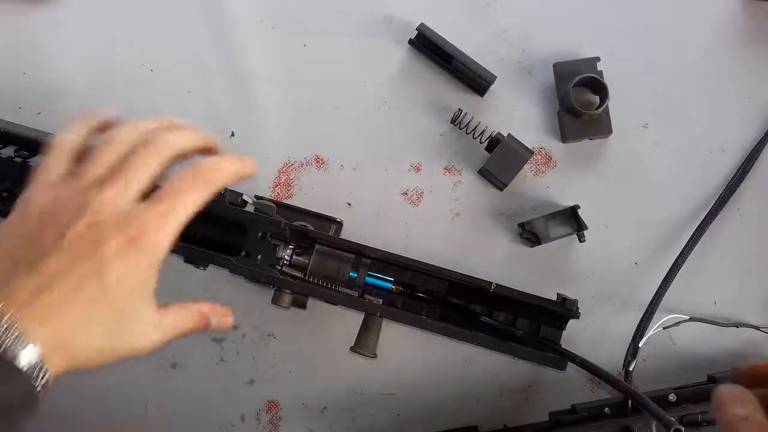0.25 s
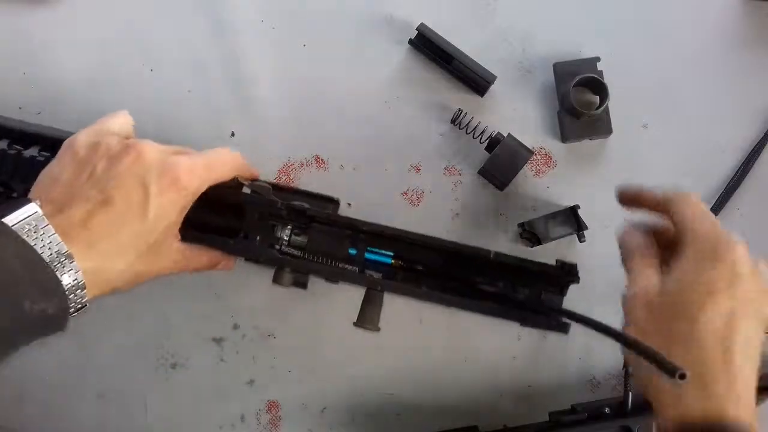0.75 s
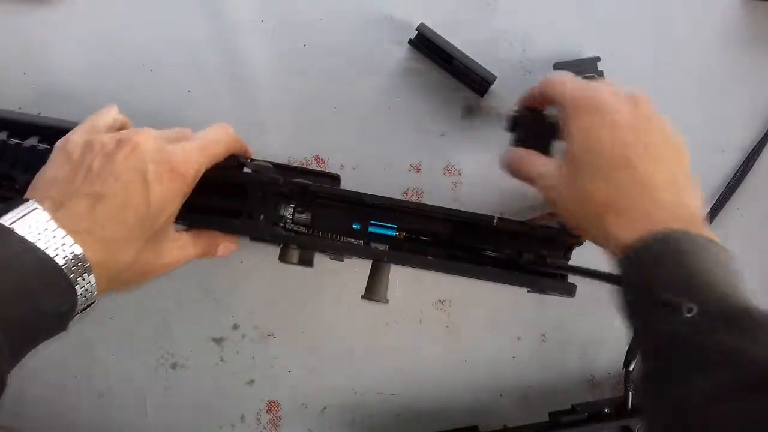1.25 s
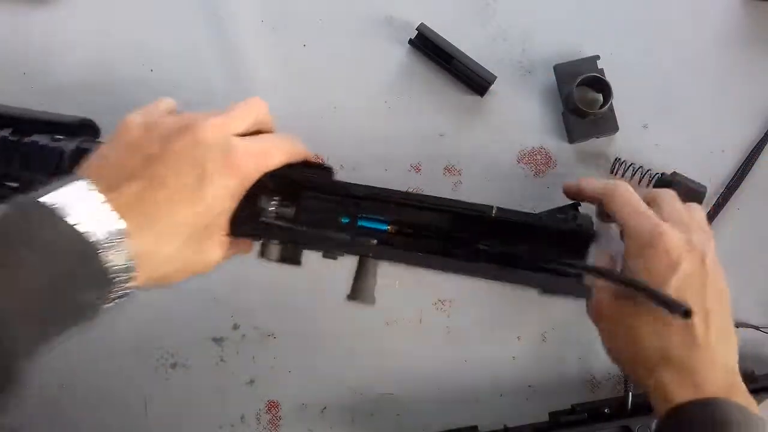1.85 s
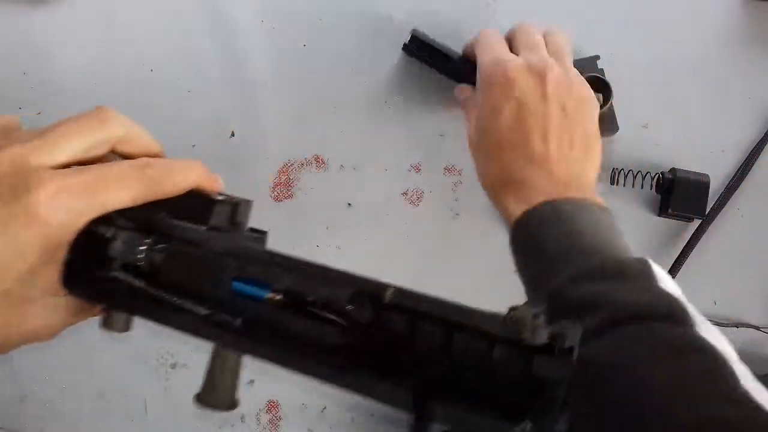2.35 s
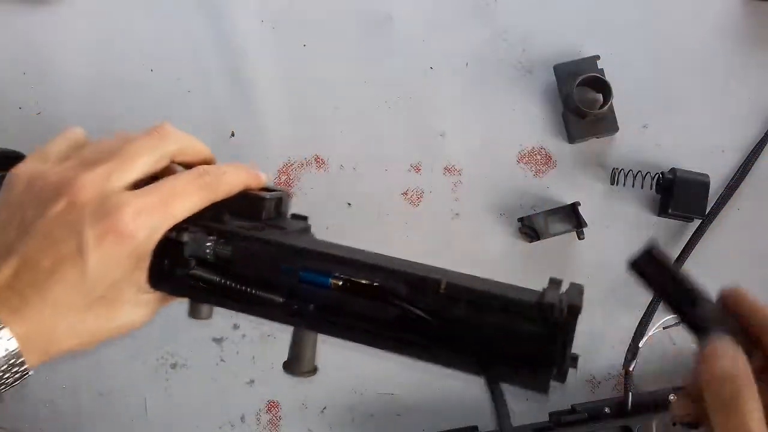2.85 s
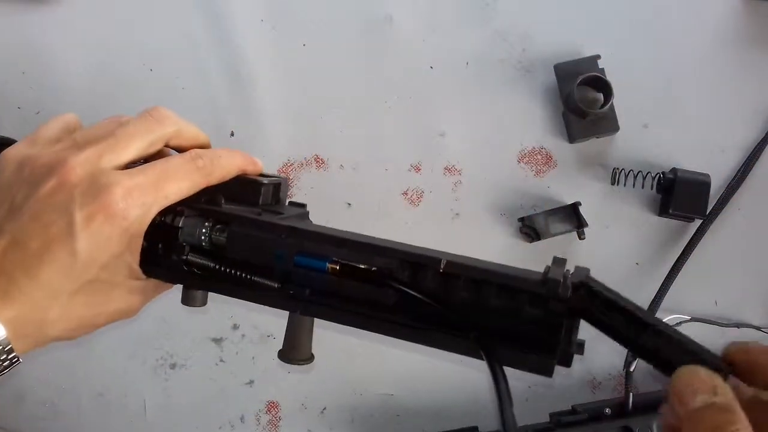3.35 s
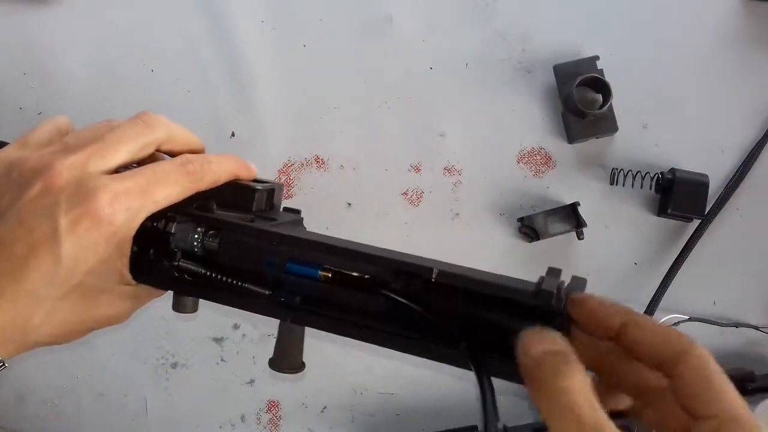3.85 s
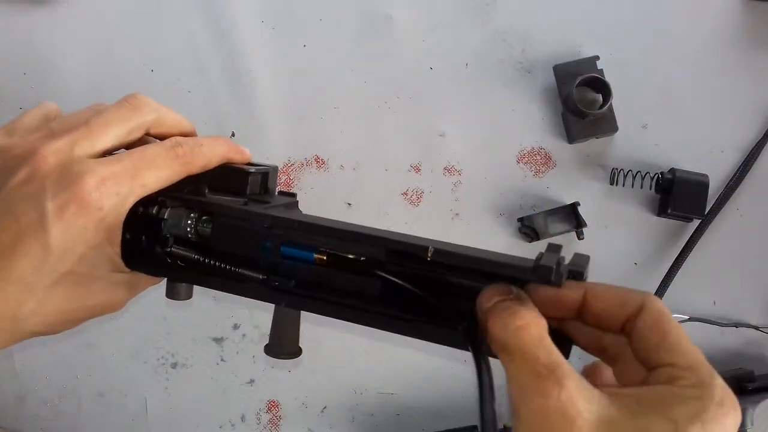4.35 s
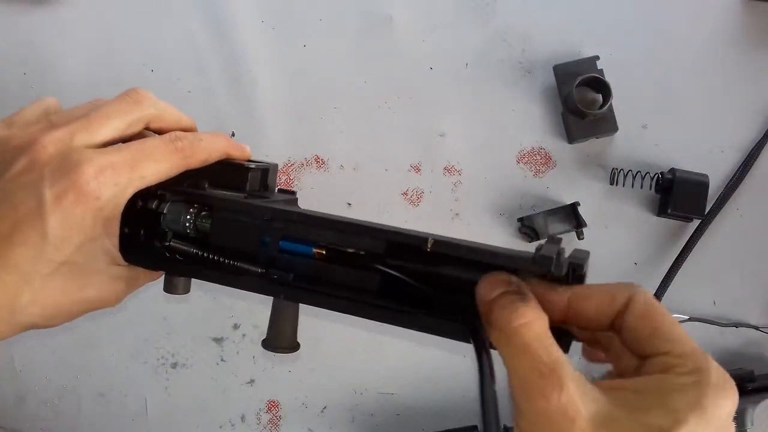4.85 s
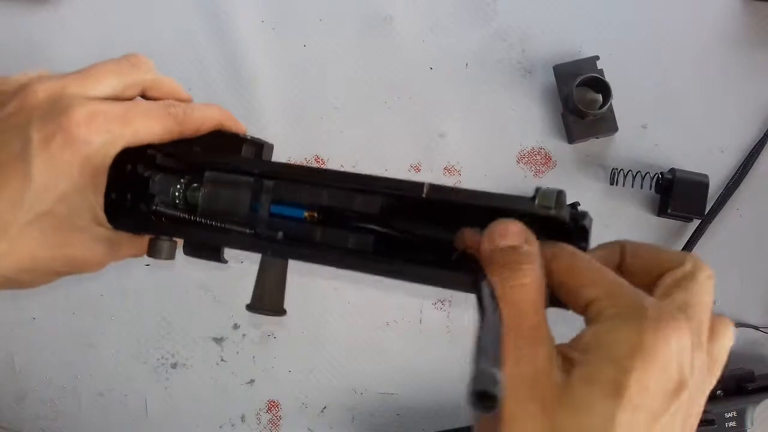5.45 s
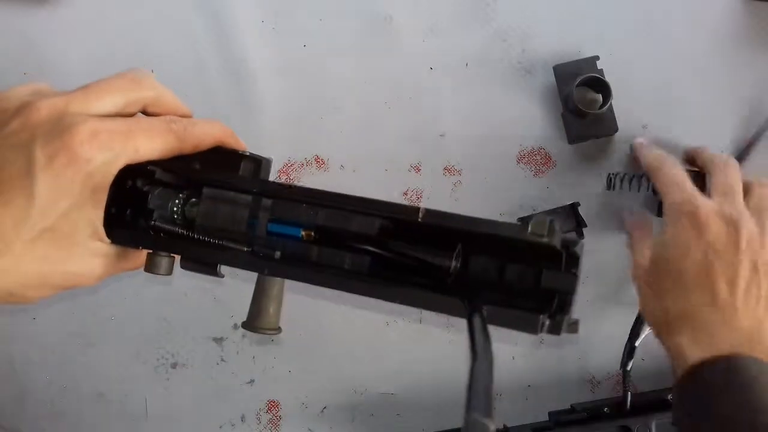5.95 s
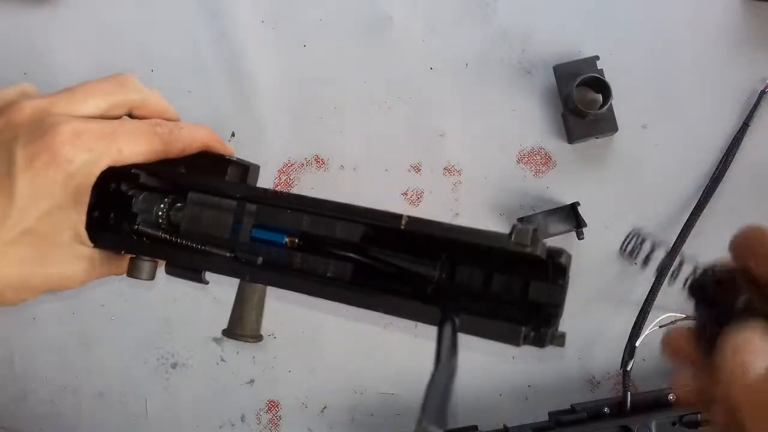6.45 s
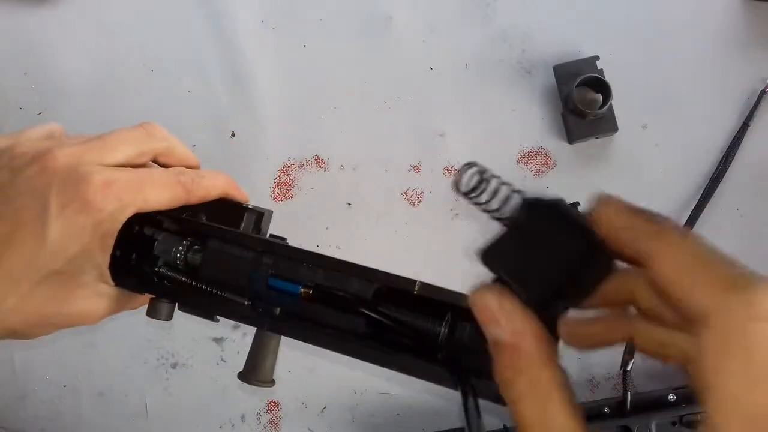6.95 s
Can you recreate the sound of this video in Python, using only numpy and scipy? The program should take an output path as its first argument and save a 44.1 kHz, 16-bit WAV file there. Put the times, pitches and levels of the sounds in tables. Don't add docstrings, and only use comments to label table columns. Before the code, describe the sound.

After a brief fade-in, rifle parts knock and shift on a wooden table in a small quiet room, with a sharp clack as a block is set down. Metal then clinks and scrapes in a tube, a latch snaps and chatters in tight bunches, and a heavy thump follows. Faint birds chirp at the end over low hum. Close, dull, nearly mono microphone.

```python
import sys
import numpy as np
from scipy import signal
from scipy.io import wavfile
from scipy.ndimage import uniform_filter1d

SR = 44100
rng = np.random.default_rng(int(sys.argv[2]) if len(sys.argv) > 2 else 0)


def linear_from_db(decibels):
    return 10 ** (np.asarray(decibels, float) / 20)


def to_wav(s):
    ch = np.atleast_2d(s).T
    pcm = np.round(np.clip(ch, -1, 1) * 32767)
    wavfile.write(sys.argv[1], SR, pcm.astype(np.int16))


N = 317343

# low_hz, high_hz
WOOD_EDGES = [(220, 501), (540, 2080), (2200, 4170)]
TUBE_EDGES = [(200, 1090), (1010, 2200), (2200, 3950)]
LATCH_EDGES = [(260, 1000), (1100, 2200), (2200, 4830)]


def evened(x):
    return x / np.sqrt(np.mean(x ** 2) + 1e-20)


def read(points, hz):
    f, value = np.transpose(points)
    return np.interp(np.log(hz + 1), np.log(f + 1), value)


def add(mix, start_s, sound):
    part = mix[round(start_s * SR):][:len(sound)]
    part += sound[:len(part)]


def resonate(x, hz, width):
    turn = np.exp(2j * np.pi * np.cumsum(hz * np.ones(len(x))) / SR)
    r = np.exp(-np.pi * width / SR)
    return 2 * (turn * signal.lfilter([1 - r], [1, -r], x / turn)).real


def registers(x, edges):
    # low_hz, high_hz
    tick_edges = (5100, 7070)
    thud, body, clink = edges
    cuts = [(thud, 4), (body, 4), ((clink[0], 5200), 4), (tick_edges, 1)]
    parts = [signal.sosfilt(signal.butter(order, hz, "band", fs=SR, output="sos"), x) for hz, order in cuts]
    dull = signal.sosfilt(signal.butter(10, clink[1], fs=SR, output="sos"), parts[:3])
    return np.array([*dull, parts[3]])


def blows(rows, modes, edges, crack_s, crack_db, ring_s, spot_db, spot_width, rise_s, tick_db):
    out = np.zeros(N)
    t = np.arange(5000) / SR
    for start_s, clink_db, thud_db, body_db, spot_hz in rows:
        hz, width, db = np.transpose([*modes, (spot_hz, spot_width, spot_db)])
        t60 = np.minimum(3.1 / width, ring_s * (1000 / hz) ** 0.5)
        vary_db, vary_hz = rng.standard_normal((2, len(hz)))
        fading = linear_from_db(db + 2 * vary_db - 60 * t[:, None] / t60)
        tones = fading * np.sin(2 * np.pi * hz * (1 + 0.032 * vary_hz) * t[:, None])
        ring = tones.sum(1)
        crack = rng.standard_normal(len(t)) * linear_from_db(-60 * t / crack_s)
        blow = ring / abs(ring).max() + linear_from_db(crack_db) * crack
        parts = registers(blow * (1 - np.exp(-t / rise_s)), edges)
        top_db = clink_db + tick_db + 0.055 * (body_db - clink_db)
        peaks = linear_from_db(np.array([thud_db, body_db, clink_db, top_db]) + 1.5)
        add(out, start_s + 0.00082, peaks / abs(parts).max(1) @ parts)
    return out


def slides(rows, mix, tone, edges, per_s, size_db, plain_db, gap=None, gap_db=-60):
    out = np.zeros(N)
    base_db, share = np.array(mix)
    for peak_s, rise, fall, peak_db, colour_db in rows:
        t = np.arange(peak_s - rise, peak_s + fall, 1 / SR)[:SR // 2]
        chance, size, sign = rng.random((len(t), 3)).T
        slips = (chance < per_s / SR) * linear_from_db(-size_db * np.log(size + 0.0046)) * np.sign(sign - 0.5)
        resonances = [*tone]
        if gap is not None:
            resonances.append((np.interp(t, *np.transpose(gap)), 250, gap_db))
        rung = linear_from_db(plain_db) * evened(slips)
        for hz, width, db in resonances:
            once = resonate(slips, hz, 2.0 * width)
            rung = rung + linear_from_db(db) * evened(resonate(once, hz, 1.6 * width))
        levels = linear_from_db(base_db + share * colour_db)
        stroke = sum(evened(part) * level for part, level in zip(registers(rung, edges), levels))
        away = np.maximum((peak_s - t) / rise, (t - peak_s) / fall)
        pressure = linear_from_db(peak_db - 25 * away ** 1.16)
        soft_ends = signal.windows.tukey(len(t), min(1, 120 / len(t)))
        add(out, t[0], stroke * pressure * soft_ends)
    return out


def steady_noise(spectrum, level_db, patchy_db):
    # pitch_hz, width_hz, level_db
    port_dips = [(10010, 760, -10.5), (15000, 270, -15)]
    frames, hz = N // 1024 + 5, np.fft.rfftfreq(4096, 1 / SR)
    a, b, patches = rng.standard_normal((frames, 2049, 3)).T
    patches = evened(uniform_filter1d(uniform_filter1d(patches, 30, 0), 5, 1))
    shape_db = read(spectrum, hz)
    for f, width, db in port_dips:
        shape_db = shape_db + db / (1 + ((hz - f) / (width / 2)) ** 4)
    z = (a + 1j * b) * linear_from_db(shape_db[:, None] + patchy_db * patches)
    noise = signal.istft(z, nperseg=4096, noverlap=3072)[1][:N]
    return linear_from_db(level_db) * evened(noise)


def hum():
    # pitch_hz, level_db (per Hz)
    middle = [(28, -27.5), (48, -14), (66, 4.5), (90, -4.5), (118, -1.5), (170, -6), (330, -9), (800, -12),
              (2000, -16), (3600, -17.5), (4700, -30.5), (8000, -31), (13000, -30.5), (15800, -31.5)]
    # pitch_hz, level_db (per Hz)
    difference = [(29, -25.5), (50, -7.5), (343, -5.5), (458, -8), (505, -5), (642, -7.5), (1940, -9),
                  (3470, -11), (4740, -21), (13700, -20.5), (15800, -18)]
    return steady_noise(middle, -65, patchy_db=1.16), steady_noise(difference, -70.5, patchy_db=3.0)


def booms():
    # start_s, peak_db, pitch_hz
    rows = [
        (0.478, -57, 119.3),
        (0.706, -41, 110.2),
        (0.971, -50, 130.6),
        (1.558, -51, 145),
        (1.78, -57, 135.7),
        (2.309, -59, 68.6),
        (2.874, -54.5, 125.3),
        (3.864, -62, 70),
        (6.058, -51.5, 99.8),
    ]
    out, t = np.zeros(N), np.arange(20000) / SR
    for start_s, db, hz in rows:
        ring = np.sin(2 * np.pi * hz * t)
        ring += 0.17 * np.sin(2 * np.pi * 2.0 * hz * t)
        ring += 0.14 * np.sin(2 * np.pi * 0.5 * hz * t)
        add(out, start_s, linear_from_db(db + 1.5 - 60 * t / 0.37) * (1 - np.exp(-t / 0.0016)) * ring)
    return out


def table_knocks():
    # start_s, clink_db, thud_db, body_db, spot_hz
    rows = [(0.4798, -48.5, -45, -54, 2580), (0.5156, -48, -55, -77, 3540), (0.624, -51, -67, -68, 3310),
            (0.7055, -32.5, -28.5, -28.5, 3500), (0.8503, -68, -54, -50, 2200),
            (0.8884, -47, -53, -46, 2200), (0.9773, -37.5, -43.5, -43.5, 2360),
            (1.054, -39, -43, -39.5, 3010), (1.5495, -29, -36.5, -31, 4030),
            (1.5906, -35, -38.5, -39.5, 2790), (1.6346, -38, -57, -40.5, 2870),
            (1.9989, -43, -51, -47, 3610), (2.2995, -54, -55.5, -53, 2440)]
    # pitch_hz, width_hz, level_db
    modes = [(440, 210, 3), (624, 20, -18), (897, 26, -8.5), (1274, 28, -21), (1590, 31, -8.5),
             (2440, 18, -41), (2160, 42, -63.5), (2974, 72, -3), (3310, 18, -30), (3500, 44, 0.5),
             (4100, 25, -6.5), (4240, 37, -53)]
    return blows(rows, modes, WOOD_EDGES, crack_s=0.033, crack_db=-1.0, ring_s=0.062,
                 spot_db=3.5, spot_width=160, rise_s=0.00024, tick_db=-23.5)


def low_rumbles():
    # peak_s, rise_s, fall_s, peak_db, colour_db (how much grit)
    rows = [(.487, 0.005, 0.015, -55.5, 7.5), (.7, 0.047, .005, -55.5, -1), (.722, 0.017, 0.09, -37.5, 3),
            (.83, 0.087, 0.74, -56.5, -1.5), (1.018, 0.043, 0.1, -54.5, 9.5), (1.565, .012, 0.04, -33.5, 3),
            (1.6, 0.018, 0.29, -47.5, 5.5), (1.775, 0.016, 0.002, -44.5, -7),
            (2.311, 0.033, 0.1, -62.5, 7.5), (2.516, 0.033, 0.081, -56.5, 6.5), (6.05, 0.03, 0.012, -35, 3)]
    # first row level_db, second row share of the colour
    mix = [(0, -14, -20.5, -38), (0, 1.5, 1.5, 1.9)]
    # pitch_hz, width_hz, level_db
    tone = [(170, 90, -12), (300, 160, -9), (445, 140, -12), (700, 326, 2), (1210, 730, 6), (2500, 1300, 1),
            (3600, 760, -2)]
    # low_hz, high_hz
    edges = [(120, 620), (600, 2200), (2200, 4170)]
    return slides(rows, mix, tone, edges, per_s=4000, size_db=3.5, plain_db=9.0)


def table_drags():
    # peak_s, rise_s, fall_s, peak_db, colour_db (brightness)
    rows = [(.52, 0.035, 0.55, -67.5, 2.5), (1.12, 0.09, 0.81, -66, 0), (.79, 0.089, 0.3, -55, -3),
            (1.058, 0.0093, 0.037, -48, 9), (1.72, 0.15, 0.19, -60, 3.5), (2.355, 0.068, 0.017, -69.5, 16),
            (2.42, 0.082, 0.078, -68.5, 0), (2.6, 0.17, 0.24, -55.5, -16.5), (2.676, .08, 0.12, -50, -18),
            (5.556, 0.025, 0.042, -54.5, 0.5), (5.68, 0.096, 0.053, -65, -12),
            (5.972, 0.11, 0.067, -60.5, 0.5), (6.03, 0.11, 0.059, -52, -5)]
    # first row level_db, second row share of the colour
    mix = [(-4.5, 0.018, 0.1, -18.5), (0, 0.069, 0.86, 1)]
    # pitch_hz, width_hz, level_db
    tone = [(287, 255, -17.5), (456, 55, -10.5), (832, 290, 6), (1200, 730, 9), (2500, 1300, 0),
            (3500, 760, -4)]
    return slides(rows, mix, tone, WOOD_EDGES, per_s=4500, size_db=1.0, plain_db=0.5)


def rings():
    # start_s, peak_db, pitch_hz, t60_s (time to fall by 60 dB)
    rows = [(1.781, -30, 440, 0.21), (3.215, -59, 650, .5), (3.25, -61, 680, 0.62), (3.6, -61, 678, 0.26),
            (3.815, -52, 313, 0.11), (4.86, -50, 664, 0.36), (1.782, -33, 1100, 0.18),
            (1.782, -34.5, 1041, .16), (1.782, -38, 1466, .08), (1.782, -39, 1800, .12),
            (1.782, -40, 800, 0.22), (6.059, -27, 858, .22), (6.059, -29.5, 806, 0.17),
            (6.059, -28.5, 890, 0.22), (6.059, -30, 978, 0.23), (6.059, -33.5, 696, .2),
            (6.059, -34, 438, .2), (6.075, -25.5, 880, .03), (6.089, -22, 900, .025),
            (6.121, -29, 1000, .03), (2.871, -51, 438, .22), (2.871, -53, 855, 0.22),
            (2.871, -50, 715, 0.2), (4.947, -29, 3050, 0.041), (4.438, -31, 3800, .05),
            (4.42, -31, 4150, .04), (1.557, -40, 300, .08), (.708, -41, 213, .15), (.9, -52.5, 312, 0.31),
            (.79, -52, 155, .4), (1.74, -52, 110, .3), (4.44, -50, 300, .1), (4.537, -46, 1880, .06),
            (3.39, -42, 3750, .06), (3.412, -44, 3700, .07)]
    out, t = np.zeros(N), np.arange(20000) / SR
    for start_s, db, hz, t60 in rows:
        add(out, start_s, linear_from_db(db - 60 * t / t60) * (1 - np.exp(-t / 0.0018)) * np.sin(2 * np.pi * hz * t))
    return out


def block_drop():
    # start_s, clink_db, thud_db, body_db, spot_hz
    rows = [
        (1.7809, -15, -30, -13, 3285),
    ]
    # pitch_hz, width_hz, level_db
    modes = [(450, 45, 4.5), (640, 70, -6.5), (1012, 100, 6), (1190, 90, -14.5), (1497, 120, -2),
             (1660, 120, -1), (1968, 90, -1), (2200, 90, -2), (2580, 170, -0.5), (2980, 60, -7.5),
             (3195, 59, 11), (3430, 78, 8), (3700, 120, -5), (3990, 120, -10)]
    # low_hz, high_hz
    edges = [(200, 720), (520, 2500), (2200, 4000)]
    return blows(rows, modes, edges, crack_s=0.0054, crack_db=-5, ring_s=0.015,
                 spot_db=-4.5, spot_width=180, rise_s=0.00016, tick_db=-39)


def board_thumps():
    # start_s, clink_db, thud_db, body_db, spot_hz
    rows = [
        (2.8697, -52.5, -36, -33, 2440),
        (5.945, -62, -59, -55.5, 2880),
        (5.9612, -58.5, -48.5, -71, 2300),
        (6.0578, -35.5, -34.5, -13.5, 1820),
    ]
    # pitch_hz, width_hz, level_db
    modes = [(439, 38, -4), (620, 60, -8), (813, 220, 2.5), (985, 80, 1), (1150, 60, -4), (1380, 80, -8.5),
             (1550, 80, -9.5), (1710, 60, -11.5), (1840, 80, -10.5), (3250, 110, -5), (3540, 80, -16)]
    # low_hz, high_hz
    edges = [(130, 480), (480, 2020), (2400, 4100)]
    return blows(rows, modes, edges, crack_s=0.007, crack_db=-11, ring_s=0.015,
                 spot_db=-26, spot_width=180, rise_s=0.00035, tick_db=-32.5)


def tube_clinks():
    # start_s, clink_db, thud_db, body_db, spot_hz
    rows = [(3.022, -32, -48.5, -38.5, 3990), (3.0892, -43, -47, -59, 4050), (3.1397, -61, -60, -68, 4100),
            (3.2938, -50, -56, -57, 3200), (3.3855, -30.5, -50.5, -58, 3500), (3.4603, -31, -58, -53, 3300),
            (3.5922, -43, -55, -49.5, 3850), (3.7895, -36.5, -70, -57, 3830), (3.8035, -50, -66, -53, 3500),
            (3.8604, -24.5, -57.5, -42.5, 4260), (3.8655, -37, -66, -44.5, 3850),
            (3.887, -49, -65, -65, 3420), (3.9035, -47, -55, -57.5, 4100),
            (4.1639, -46, -59.5, -47.5, 3620)]
    # pitch_hz, width_hz, level_db
    modes = [(650, 13, -22.5), (1066, 53, -23), (1370, 40, -29.5), (1574, 30, -23), (1893, 140, -1.5),
             (2555, 120, -24), (3200, 130, -9.5), (3640, 200, 6), (4050, 170, 10.5), (4550, 110, 8)]
    return blows(rows, modes, TUBE_EDGES, crack_s=0.011, crack_db=-9, ring_s=0.15,
                 spot_db=10, spot_width=390, rise_s=0.00049, tick_db=-20.5)


def tube_slides():
    # peak_s, rise_s, fall_s, peak_db, colour_db (how much the heavy body sounds along)
    rows = [
        (3.06, .02, 0.039, -50.5, 2.5),
        (3.138, 0.01, 0.019, -53, -1),
        (3.215, 0.014, 0.035, -49, -2.5),
        (3.24, 0.041, 0.042, -48, -2),
        (3.365, 0.03, 0.05, -40, -3),
        (3.395, .012, .025, -44.5, -2.5),
        (3.415, 0.011, 0.06, -45.5, -2.5),
        (3.47, 0.012, 0.056, -61, 1),
        (3.8, 0.0029, 0.038, -66.5, 4.5),
    ]
    # first row level_db, second row share of the colour
    mix = [(-8, -4, 0, -13), (3, 2, 0, 0.7)]
    # pitch_hz, width_hz, level_db
    tone = [(674, 21, -20), (1150, 1150, -5.5), (1270, 41, -20), (1643, 36, -16), (3190, 180, -5),
            (4010, 120, -5), (4540, 98, -4)]
    # time_s, pitch_hz
    gap = [(3.04, 4000), (3.22, 4050), (3.37, 4050), (3.40, 3720), (3.46, 3400), (3.86, 3770)]
    return slides(rows, mix, tone, TUBE_EDGES, per_s=2700, size_db=3.0, plain_db=-7, gap=gap, gap_db=2.5)


def latch_snaps():
    # start_s, clink_db, thud_db, body_db, spot_hz
    rows = [(4.4188, -27, -48, -40, 3990), (4.4372, -16.5, -45, -31, 4100),
            (4.4515, -24, -57.5, -36.5, 4230), (4.5347, -45, -58, -46, 3420),
            (4.6023, -47, -74, -60.5, 4240), (4.8435, -32, -59.5, -41, 3700), (4.8486, -15, -42, -28, 3500),
            (4.857, -19.5, -49.5, -31, 3400), (4.9457, -27, -49.5, -40, 3100),
            (4.8535, -23, -54, -33.5, 3300), (4.8615, -25.5, -43, -30.5, 3700),
            (4.867, -26.5, -49.5, -38, 3500), (4.952, -36.5, -57, -44, 3000),
            (4.957, -41.5, -55.5, -48, 2950), (5.2672, -21, -42, -25, 2400), (5.272, -27, -42, -43, 2900),
            (5.533, -45, -60.5, -54, 4100)]
    # pitch_hz, width_hz, level_db
    modes = [(1582, 29, -10), (1895, 88, -6.5), (3320, 140, -1.5), (3610, 73, -10.5), (3920, 63, -0.5),
             (4200, 150, -23), (5000, 110, -17)]
    return blows(rows, modes, LATCH_EDGES, crack_s=0.016, crack_db=-6, ring_s=0.022,
                 spot_db=4.0, spot_width=270, rise_s=0.00027, tick_db=-21.5)


def latch_chatter():
    # start_s, clink_db, thud_db, body_db, spot_hz
    rows = [(5.1378, -45, -61, -52, 3290), (5.1483, -32.5, -58.5, -46.5, 3250),
            (5.1515, -27.5, -55.5, -40.5, 2830), (5.1588, -28.5, -53.5, -30, 2980),
            (5.1635, -28, -52, -31.5, 3050), (5.173, -32.5, -54, -38.5, 2900),
            (5.178, -19, -52.5, -46, 3290), (5.1825, -19, -48, -42, 3450), (5.187, -20, -50.5, -46, 3700),
            (5.191, -18.5, -47, -40, 3850), (5.196, -23.5, -52.5, -44, 3700),
            (5.203, -26.5, -51.5, -42.5, 3900), (5.208, -30.5, -54, -40.5, 4000),
            (5.233, -37.5, -54.5, -40.5, 3900), (5.2495, -33, -56, -43, 3270),
            (5.2545, -31.5, -51, -41, 3200), (5.262, -34.5, -56, -44, 3300)]
    # pitch_hz, width_hz, level_db
    modes = [(1340, 120, -3), (1900, 200, -9), (3000, 200, -10), (4200, 250, -7), (4900, 300, -12.5)]
    return blows(rows, modes, LATCH_EDGES, crack_s=0.014, crack_db=-5.5, ring_s=0.03,
                 spot_db=4.5, spot_width=140, rise_s=0.0004, tick_db=-20.5)


def latch_slides():
    # peak_s, rise_s, fall_s, peak_db, colour_db (how much the heavy body sounds along)
    rows = [
        (5.152, 0.003, 0.032, -40, -2.5),
        (5.165, 0.02, 0.03, -46, 0),
        (5.19, 0.02, 0.04, -24, -1),
        (5.235, 0.052, .06, -46, -3),
    ]
    # first row level_db, second row share of the colour
    mix = [(-22.5, -13, 0.008, -15.5), (1.2, 0, 0.018, -0.4)]
    # pitch_hz, width_hz, level_db
    tone = [(1480, 120, -16), (1950, 1000, -23.5), (3400, 230, -4), (4200, 610, 4), (5156, 420, -16.5)]
    # time_s, pitch_hz
    gap = [(5.14, 3320), (5.16, 3006), (5.195, 3610), (5.27, 3380)]
    return slides(rows, mix, tone, LATCH_EDGES, per_s=5000, size_db=3.5, plain_db=-12, gap=gap, gap_db=5.5)


def birds():
    # start_s, length_s, start_hz, end_hz, level_db
    rows = [
        (6.262, 0.071, 4250, 3900, -73),
        (6.327, 0.063, 2750, 2500, -70),
        (6.42, 0.19, 2500, 2930, -76),
        (6.586, 0.062, 2300, 2414, -73),
        (6.95, 0.042, 3260, 3240, -79),
        (6.818, 0.088, 3320, 3230, -69),
        (6.88, 0.086, 3250, 3180, -87),
        (6.905, 0.045, 4200, 3830, -76),
        (7.162, 0.037, 3050, 2800, -75),
    ]
    out = np.zeros(N)
    for start_s, length, hz0, hz1, db in rows:
        count = round(length * SR)
        fuzz = 1 + 0.7 * evened(uniform_filter1d(rng.standard_normal(9000), 90))[:count]
        whistle = np.sin(2 * np.pi * np.cumsum(np.linspace(hz0, hz1, count)) / SR)
        add(out, start_s, linear_from_db(db) * fuzz * whistle * np.hanning(count))
    return out


def room(x, gap_s, early_db, early_s):
    # pitch_hz, t60_s
    decay = [(100, 0.48), (400, 0.31), (1200, 0.33), (3000, 0.31), (6000, 0.18), (14000, 0.47)]
    taps = np.zeros((2, SR // 2))
    at = np.arange(round(gap_s * SR), SR // 2 - 20, 20)
    at = at + rng.integers(0, 20, (2, len(at)))
    np.put_along_axis(taps, at, rng.choice([-1., 1.], at.shape), 1)
    hz, t, z = signal.stft(taps, SR, nperseg=256)
    late = linear_from_db(-60 * t / read(decay, hz)[:, None])
    early = linear_from_db(early_db - 60 * t / early_s)
    tail = signal.istft(z * (late + early), SR, nperseg=256)[1]
    return signal.fftconvolve(x[None], tail / np.linalg.norm(tail[0]), axes=1)[:, :N]


def scene():
    near = table_knocks() + tube_clinks() + latch_snaps() + latch_chatter()
    far = block_drop() + board_thumps()
    rub = low_rumbles() + table_drags() + tube_slides() + latch_slides()
    echo = room(linear_from_db(-4) * near + linear_from_db(-6.5) * rub, gap_s=0.0044, early_db=10.5, early_s=0.038)
    echo += room(linear_from_db(1.5) * far, gap_s=0.00208, early_db=5.0, early_s=0.02)
    hum_mid, hum_side = hum()
    mid = near + far + linear_from_db(-2.0) * rub + echo[0] + booms() + rings() + birds() + hum_mid
    side = linear_from_db(-54.0) * (near + far + rub) + linear_from_db(-75) * echo[1] + hum_side
    return np.array([mid + side, mid - side])


def roll_off(x):
    return signal.sosfilt(signal.butter(12, 15960, fs=SR, output="sos"), x)


def record(dry):
    # time_s, gain_db
    points = [
        (.15, -43),
        (.2, -22),
        (.26, -11.5),
        (.35, -6),
        (.46, -1),
        (.62, -0.5),
    ]
    time_s, gain_db = np.transpose(points)
    fade = linear_from_db(np.interp(np.arange(N) / SR, time_s, gain_db, left=-120))
    return roll_off((dry - 0.0005) * fade)


dry = scene()
out = record(dry)
to_wav(out)
```